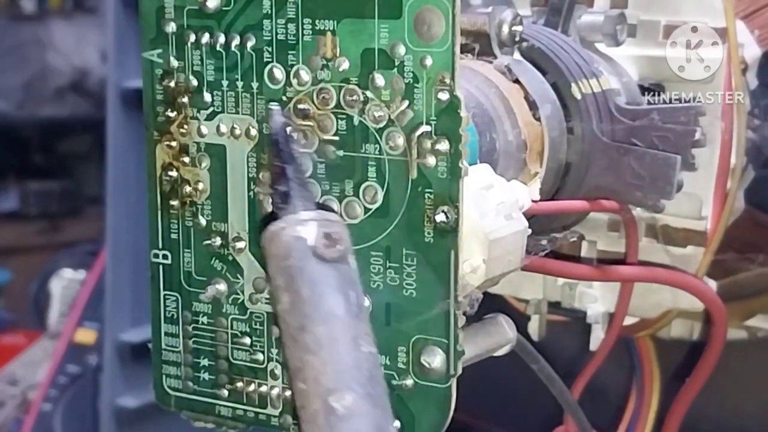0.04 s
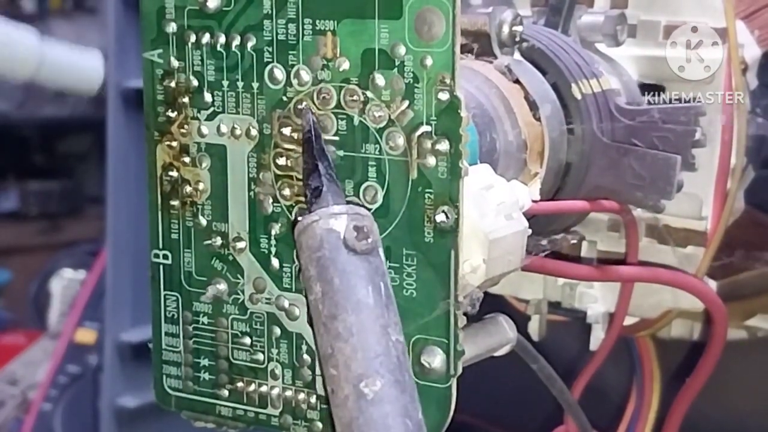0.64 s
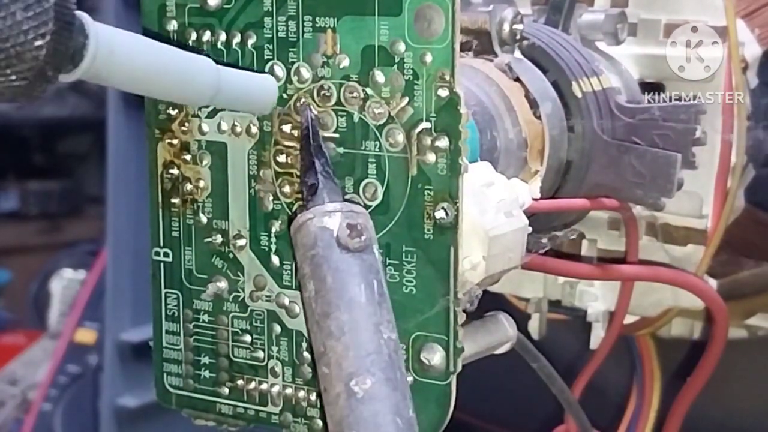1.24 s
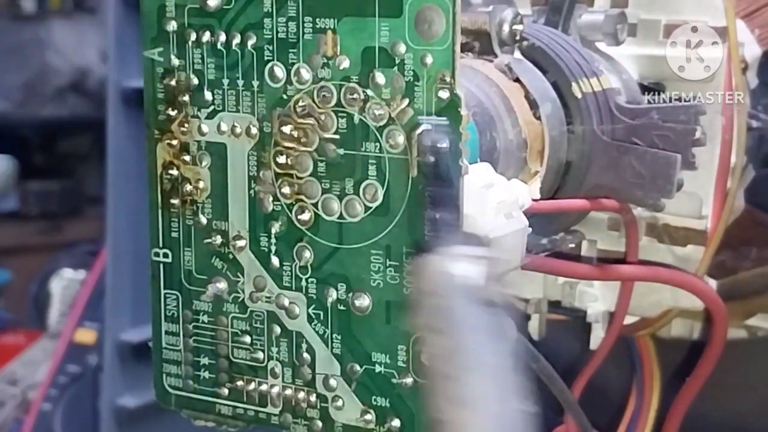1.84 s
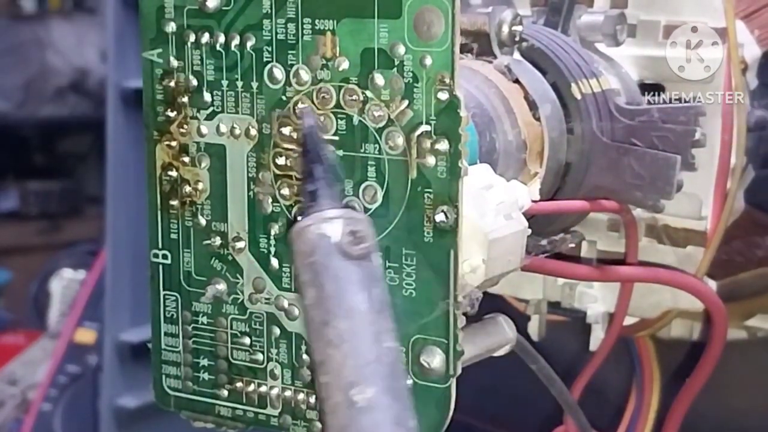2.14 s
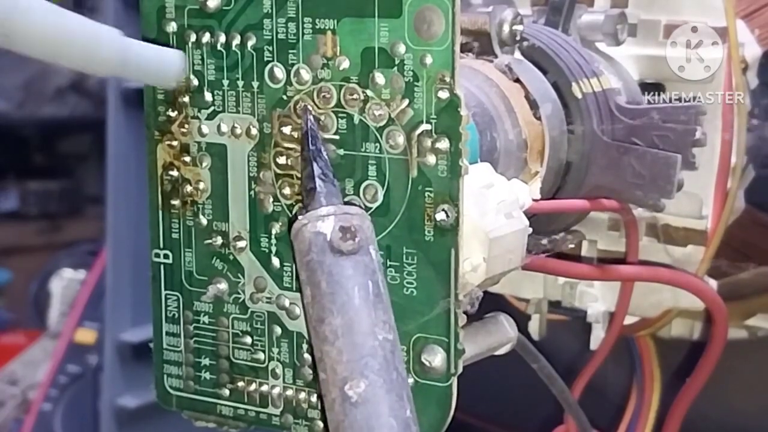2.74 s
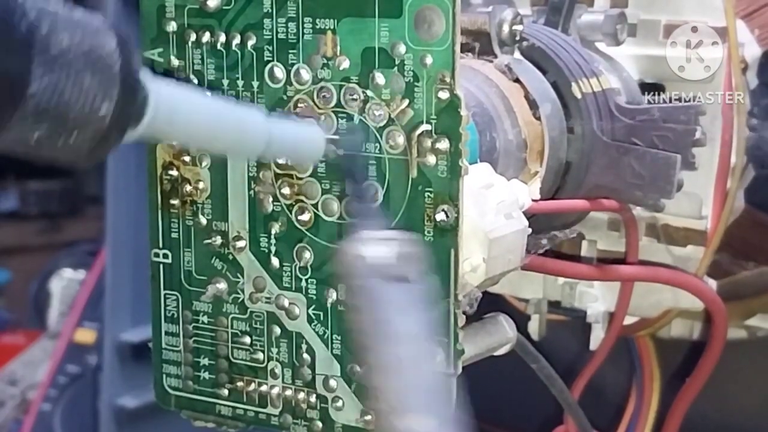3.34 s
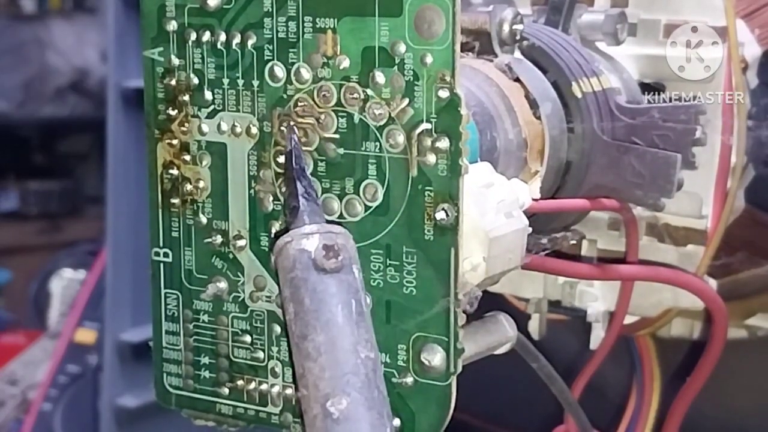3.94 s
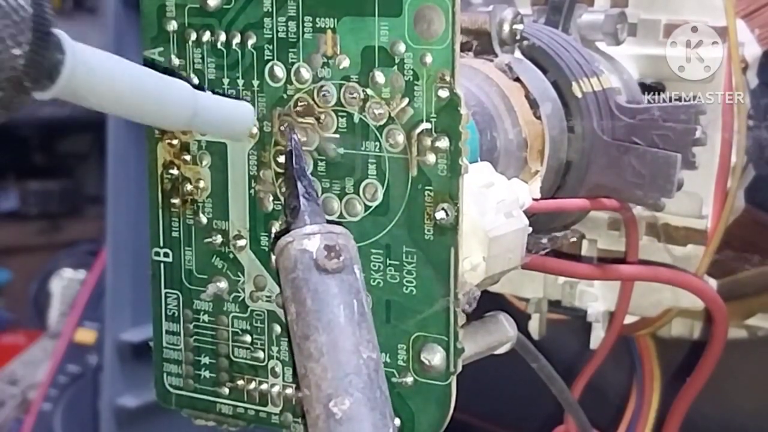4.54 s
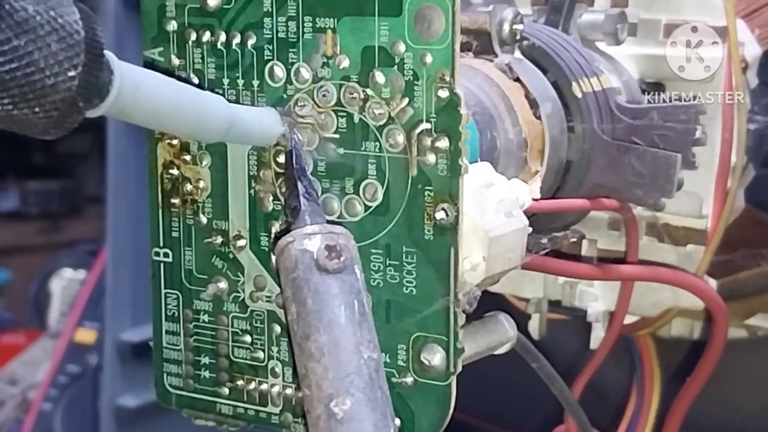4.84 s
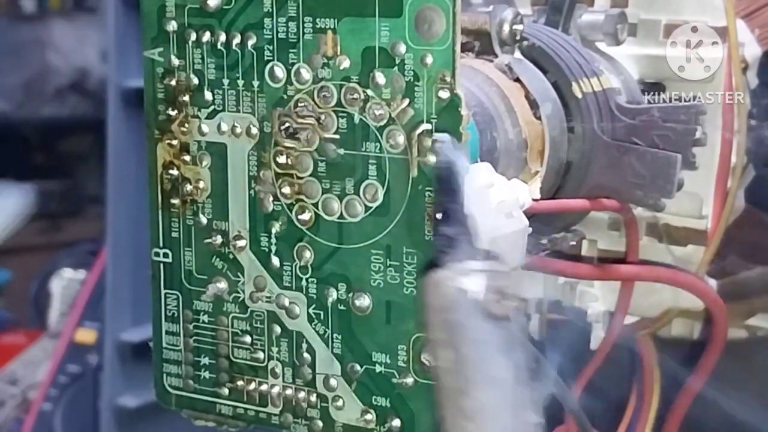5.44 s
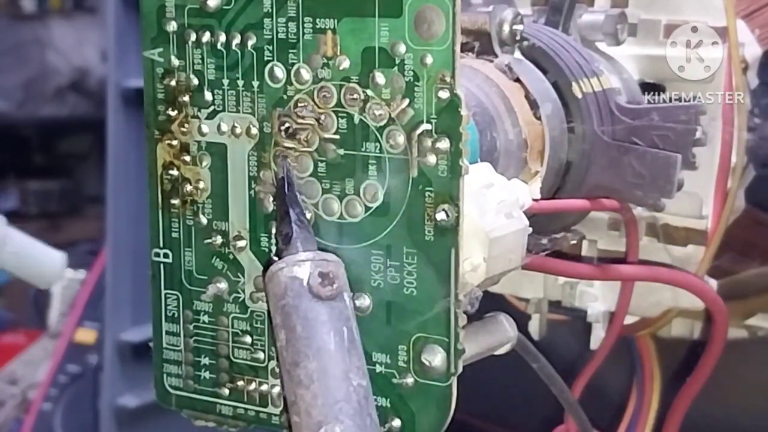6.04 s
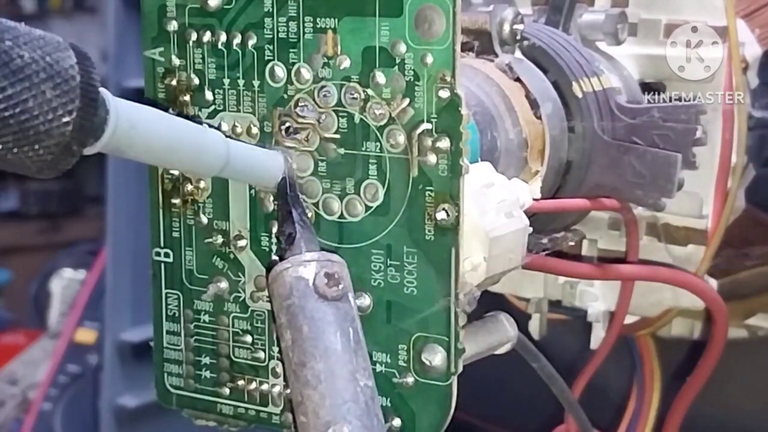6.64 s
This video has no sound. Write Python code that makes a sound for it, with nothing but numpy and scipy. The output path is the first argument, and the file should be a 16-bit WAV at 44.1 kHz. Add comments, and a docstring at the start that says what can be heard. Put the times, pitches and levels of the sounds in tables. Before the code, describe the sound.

A solder sucker is worked close to the microphone in a small workshop. Throughout, a draught buffets the left side with low, uneven rumbles over a quiet room hum. At about 0.2 seconds the plunger is pushed down and latches with a sharp click. Flux sizzles very faintly during the first two seconds. At 1.7 seconds the spring releases with a sharp, slightly ringing snap, and the tool is recocked with two clicks around 2.2 seconds. A bird chirps faintly outside from 2.5 to 3 seconds. A second snap comes at 3.4 seconds, followed by cocking clicks and a soft thud of air near 3.9. A vehicle passes quietly, closest at 4.5 seconds with a faint brake squeal. As it fades, the sucker fires again at 5.3 seconds and latches near 5.9. Light metal ticks are scattered around the snaps until about 6.2 seconds.

```python
"""Desoldering in a small workshop, close to a phone. From the start a draught buffets the left microphone
port over the room's hum, flux sizzles faintly, and a solder sucker is pushed down until it latches. Metal
parts tick; the released spring drives the piston into its stop, and the tool is cocked again. A bird calls
outside, then comes a second shot and a third cocking. A vehicle passes with a faint squeal of brakes,
and as it fades the sucker fires a third time and is latched once more."""
import sys
import numpy as np
from scipy import signal
from scipy.fft import rfft, irfft, next_fast_len
from scipy.io import wavfile
from scipy.ndimage import uniform_filter1d

SR = 44100
rng = np.random.default_rng(int(sys.argv[2]) if len(sys.argv) > 2 else 0)


def transcribe(signal):
    """Save signal, clipped to [-1, 1], as a 16-bit WAV file at the path in sys.argv[1]."""
    frames = np.atleast_2d(signal).T
    limited = np.clip(frames, -1, 1)
    pcm = np.round(limited * 32767).astype(np.int16)
    wavfile.write(sys.argv[1], SR, pcm)


N = 295029
T = np.arange(N) / SR

# Spectra of the steady noises. Each row: frequency in Hz, relative level in dB.
ROOM_SPECTRUM = [(25, -13), (50, 7), (100, 5.5), (180, -8), (290, -1.5), (450, -10), (1000, -20.5),
                 (1800, -25.5), (3800, -31.5), (5600, -23), (8000, -28.5), (10000, -25), (15000, -36)]
ROAD_SPECTRUM = [(60, 16.5), (110, 9.5), (280, 10), (470, 0), (610, 1.5), (740, 0), (1000, -1),
                 (1400, -6.5), (2000, -7), (2330, -12), (3000, -9.5), (6500, -18.5), (9800, -14.5),
                 (15000, -25)]
DRAUGHT_SPECTRUM = [(20, -32.5), (35, -14), (55, 2.5), (78, -2.5), (105, -1.5), (190, -12), (280, -17.5),
                    (420, -30), (800, -47.5), (2000, -63.5)]
# Tones of mains and fan, engine and gears, and brakes. Each row: frequency in Hz, relative level in dB.
HUM_TONES = [(100.5, -69), (269, -76), (301, -79)]
ENGINE_TONES = [(608, -17), (1000, -15), (2330, -19)]
BRAKE_TONES = [(3338, -66), (4700, -69), (4759, -66), (5814, -63.5), (9432, -75), (11370, -79)]
# Bird calls. Each row: start and length in seconds, first and last frequency in Hz, level in dB.
BIRD_CALLS = [(2.49, 0.094, 5870, 3850, -64.5), (2.556, 0.11, 4730, 3720, -63),
              (2.698, 0.12, 4560, 4430, -69.5), (2.972, 0.1, 5500, 3750, -59.5)]
# Gusts at the port. Each row: start in seconds, length in seconds, relative level in dB.
GUSTS = [(0, 0.067, -43.5), (0.068, 0.14, -41.5), (0.319, 0.13, -53), (0.629, 0.21, -42),
         (1.046, 0.39, -50.5), (1.296, 0.075, -37), (1.444, 0.14, -43), (1.607, 0.38, -45),
         (2.102, 0.39, -74), (2.269, 0.02, -47), (2.931, 0.12, -58.5), (2.999, .58, -41.5),
         (3.681, 0.056, -44), (3.936, 0.022, -31), (4.05, 0.049, -39), (4.32, 0.057, -42.5),
         (4.402, 1.72, -53), (4.548, 0.39, -44), (5.242, 0.18, -46), (5.41, 0.094, -37.5),
         (5.679, 0.28, -40), (6.215, 1.04, -50.5), (6.33, 0.079, -41)]
# The strongest eddies, and air from the nozzle hitting the port. Each row: time in seconds, level in dB.
STRONG_EDDIES = [(.656, -23.5), (0.687, -17.5), (1.344, -16), (1.479, -24), (1.631, -21.5), (1.861, -18),
                 (3.03, -16), (3.103, -19), (3.306, -16), (4.894, -18.5), (5.135, -20), (5.429, -19.5),
                 (5.741, -17), (5.959, -20.5)]
NOZZLE_PUFF = [(3.9402, -17)]
# Flux boiling at the tip. Each row: start and length in seconds, relative level in dB, band frequency in Hz.
SIZZLES = [(0.034, 0.098, -42, 12030), (0.637, 0.055, -51, 3180), (0.872, 0.11, -57.5, 9250),
           (1.27, 0.13, -47, 2980), (1.29, .1, -72, 10900), (1.656, 0.052, -53.5, 3280)]
# Light contacts of trigger, thumb, nozzle and iron, and hollow knocks of the plastic grip.
# Each row: time in seconds, relative level in dB.
TICKS = [(0.3574, -31), (0.4468, -30), (0.4624, -29), (1.723, -32), (1.7348, -26.5), (1.9201, -27),
         (2.3962, -26), (2.708, -49.5), (3.3708, -25.5), (3.5906, -21.5), (3.608, -29), (4.057, -28),
         (4.0978, -43), (5.3135, -32), (5.527, -25), (5.8689, -22), (5.972, -38), (6.1932, -43),
         (6.199, -40)]
GRIP_KNOCKS = [(.3365, -36.5), (1.7245, -45.5)]
# Blows on the sucker: the thumb starts the plunger, the catch takes it, the piston hits its stop.
# Each row: time in seconds, relative level in dB, offsets in dB for the spring and for the barrel.
PUSHES = [(.194, -20, -9.5, -14), (2.1218, -21, -6, 4), (3.808, -20, 2.5, -1), (5.7402, -19, -3, -0.5)]
LATCHES = [(0.36, -16, -16, 7.5), (2.278, -14.5, -2, -8), (3.941, -12.5, -8, -4), (5.8725, -15, 3, 3.5)]
SHOTS = [(1.7424, -17.5, 0.5, -2), (3.3967, -19, -2.5, -6), (5.3418, -17.5, -3.5, -3.5)]
# Spectra of the contacts. Each row: frequency in Hz, relative level in dB.
TICK_SPECTRUM = [(200, -12.5), (1000, -14), (2700, -17), (3600, -6), (4800, -2.5), (7000, -8.5),
                 (11000, -11.5), (15000, -14.5)]
GRIP_SPECTRUM = [(300, -20), (750, -10), (1050, 5.5), (1400, -7.5), (1850, -4.5), (2500, -10),
                 (4000, -10.5), (12000, -10)]
PUSH_SPECTRUM = [(200, 9), (600, -8.5), (1800, -14), (3000, -6.5), (4900, 5), (6300, -1.5), (8500, 3.5),
                 (10300, -1), (11800, 0.5), (15000, -1)]
LATCH_SPECTRUM = [(200, -0.5), (700, -13), (1600, -30.5), (2450, -8.5), (3200, 1.5), (3500, -7.5),
                  (4200, 0.5), (5200, -4.5), (8200, -2), (10500, -6.5), (12700, -8.5), (15000, -4.5)]
SHOT_SPECTRUM = [(200, 0), (700, -9), (1800, -15.5), (2400, -6.5), (2870, -7), (3200, 0.5), (3900, -8),
                 (5200, 1.5), (6800, -4), (8200, -1.5), (10000, -3.5), (11800, -1), (15000, -8)]
# Modes of the puff's thud, the barrel, the spring and the body that the recoil shakes.
# Each row: frequency in Hz, relative level in dB, time to decay by 60 dB in seconds.
THUD_MODES = [(161, 13, 0.015), (66, -4.5, 0.064)]
BARREL_MODES = [(3930, -35, .06), (4365, -20.5, .018), (4450, -23, .014), (4900, -33, .02),
                (8200, -36.5, 0.068)]
SPRING_MODES = [(2870, -33, .07), (3070, -32, .045)]
BODY_MODES = [(150, -27, 0.037), (216, -20.5, 0.12), (468.6, -33.5, 0.13)]


def undb(db):
    """Amplitude ratio of a level in decibels."""
    return 10 ** (np.asarray(db) / 20)


def unit(x):
    """Normalisation to an rms of 1."""
    return x / np.sqrt(np.mean(x ** 2))


def add(out, s, sound):
    """Superposition: a sound joins the mix at s seconds."""
    i = max(int(s * SR), 0)
    out[i:i + len(sound)] += sound[:N - i]


def impulses(rows):
    """Ideal impacts: one impulse for each row of time and level."""
    out = np.zeros(N)
    for s, db, *_ in rows:
        add(out, s, undb([db]))
    return out


def ring(x, response):
    """Convolution: a linear system answers x through its impulse response."""
    return signal.fftconvolve(x, response)[:N]


def cut(x, hz, kind, order=2):
    """Butterworth filtering, maximally flat in the passband."""
    sections = signal.butter(order, np.minimum(hz, SR / 2 - 1), kind, fs=SR, output="sos")
    return signal.sosfilt(sections, x)


def gains(spectrum, size):
    """Gains on the bins of a transform, by interpolation of level over log frequency."""
    hz, db = np.transpose(spectrum)
    return undb(np.interp(np.log(np.fft.rfftfreq(size, 1 / SR) + 1), np.log(hz), db))


def noise(spectrum):
    """Spectral shaping of white noise, at an rms of 1."""
    size = next_fast_len(N, True)
    return unit(irfft(rfft(rng.standard_normal(size)) * gains(spectrum, size))[:N])


def colour(spectrum, size=1024):
    """Minimum-phase response of unit energy, by folding the cepstrum onto positive time."""
    cepstrum = irfft(np.log(gains(spectrum, size)))
    cepstrum[1:size // 2] *= 2
    cepstrum[size // 2 + 1:] = 0
    response = irfft(np.exp(rfft(cepstrum)))
    return response / np.linalg.norm(response)


def drift(per_s):
    """Random modulation of rms 1: straight ramps join per_s values a second."""
    step = int(SR / per_s)
    held = np.repeat(rng.standard_normal(N // step + 1), step)
    return unit(uniform_filter1d(held, step)[:N])


def tones(rows, waver):
    """Frequency modulation: each sinusoid wanders by the rms fraction waver."""
    return sum(undb(db) * np.sin(2 * np.pi * np.cumsum(hz * (1 + waver * drift(150))) / SR)
               for hz, db in rows)


def modes(rows):
    """Free vibration as a sum of exponentially damped sinusoids."""
    t = T[:SR // 2]
    return sum(undb(db - 60 * t / t60) * np.sin(2 * np.pi * hz * t) for hz, db, t60 in rows)


def contacts(rows, chatter_s, swell_s, swell_db):
    """Exponential envelopes: a brief noise swells into each click, and chatter decays after it."""
    out, t = np.zeros(N), T[:SR // 20]
    for s, db, *_ in rows:
        chatter, swell = rng.choice([-1., 1.], (2, len(t))) * np.exp(-t / np.array([[chatter_s], [swell_s]]))
        add(out, s, undb(db) * chatter / np.linalg.norm(chatter))
        add(out, s - len(t) / SR, undb(db + swell_db) * swell[::-1] / np.linalg.norm(swell))
    return out


def reverberation(x, t60, treble_t60, crossover_hz=2500):
    """Diffuse field: each port receives different reflections, and the treble decays sooner."""
    t, out = T[:SR], []
    for hiss in rng.standard_normal((2, SR)):
        bass = cut(hiss, crossover_hz, "low") * undb(-60 * t / t60)
        treble = cut(hiss, crossover_hz, "high") * undb(-60 * t / treble_t60)
        tail = (bass - treble) * (1 - np.exp(-t / .0008))
        tail *= 1 + 3.1 * np.exp(-t / 0.0035)  # strong early reflections
        out.append(ring(x, tail / np.linalg.norm(tail)))
    return np.array(out)


def near(x, db, right_db, room_db, radiated=None, lag_samples=19):
    """Direct sound reaches the left port first and louder; what radiates all round excites the room."""
    direct = np.array([x, undb(right_db) * np.roll(x, lag_samples)])
    room = reverberation(x if radiated is None else radiated, t60=0.32, treble_t60=0.24)
    return undb(db) * (direct + undb(room_db) * room * undb([[-.8], [.8]]))


def room_tone():
    """Noise floor: broadband hiss and the building's murmur, with tones of mains and fan."""
    murmur = undb(-65) * cut(noise(ROOM_SPECTRUM), 700, "low")
    hum = tones(HUM_TONES, waver=0.01) * undb(2.8 * drift(8))
    hiss = undb(-62.5) * np.array([noise(ROOM_SPECTRUM) for _ in range(2)])
    return (hiss + murmur) * undb(0.78 * drift(14)) + hum


def vehicle(closest_s=4.476, approach_s=1.0, leave_s=1.48):
    """A passing source: tyres and engine are louder and brighter when close; the brakes squeal faintly."""
    away = (T - closest_s) / np.where(T < closest_s, approach_s, leave_s)
    passing, far_traffic = undb(-48.5) * np.exp(-away ** 2), undb(-77)
    db = 20 * np.log10(np.hypot(passing, far_traffic))
    tyres = np.array([noise(ROAD_SPECTRUM) * undb(1.3 * drift(14)) for _ in range(2)])
    engine = tones(ENGINE_TONES, waver=0.053) * undb(1.8 * drift(3.2))
    rolling = tyres + reverberation(engine, t60=0.24, treble_t60=0.16)
    bass = cut(rolling, 2200, "low", order=1)
    treble = (rolling - bass) * undb(0.2 * (db - db.max()))
    road = (bass + treble) * undb(db + np.array([[-.7], [.7]]))
    squeal = tones(BRAKE_TONES, waver=0.013) * np.exp(-((T - 4.48) / 0.21) ** 2)
    return road + reverberation(squeal, t60=0.28, treble_t60=0.17)


def bird():
    """Falling frequency sweeps, rougher when wider, smeared by reflection from the house fronts."""
    out = np.zeros(N)
    for s, length, start_hz, end_hz, db in BIRD_CALLS:
        size = int(length * SR)
        roughness_hz = .17 * (start_hz - end_hz) * drift(1500)[:size]
        hz = np.geomspace(start_hz, end_hz, size) + roughness_hz
        add(out, s, undb(db) * np.sqrt(np.hanning(size)) * np.sin(2 * np.pi * np.cumsum(hz) / SR))
    return reverberation(out, t60=1.0, treble_t60=0.81)


def gusts(attack_s=0.0086, release_s=0.017, sag_db=3, flutter_db=3):
    """Envelope of an unsteady flow: gusts rise, sag and die away, adding in power."""
    power = np.zeros(N)
    for s, length, db in GUSTS:
        rise = np.clip((T - s) / attack_s, 0, 1)
        sag = undb(-sag_db * np.clip((T - s) / length, 0, 1))
        release = np.exp(-np.clip((T - s - length) / release_s, 0, 20))
        power += (undb(db) * rise * sag * release) ** 2
    return np.sqrt(power) * undb(flutter_db * drift(35))


def draught(eddies_per_s=28, eddy_width_s=0.00169):
    """Turbulent pressure and a puff from the nozzle strike the left port; the right is sheltered."""
    strength = gusts()
    radius_squared = ((T[:SR // 25] - 1 / 50) / eddy_width_s) ** 2
    eddy_pulse = (radius_squared - 1) * np.exp(-radius_squared / 2)  # suction between two pushes
    small_eddies = (rng.random(N) < eddies_per_s / SR) * strength * undb(14.5)
    eddies = signal.fftconvolve(impulses(STRONG_EDDIES) + small_eddies, eddy_pulse, "same")
    drone = unit(tones(HUM_TONES[:1], waver=0.021))  # the low hum swells with the gusts
    thud = ring(impulses(NOZZLE_PUFF), modes(THUD_MODES))
    left = strength * (undb(5.5) * noise(DRAUGHT_SPECTRUM) + drone) + eddies - thud
    right = undb(-10) * strength * noise(DRAUGHT_SPECTRUM)
    return np.array([left, right])


def flux():
    """Boiling: dense tiny bursts merge into band-limited noise that swells and fades."""
    out = np.zeros(N)
    for s, length, db, hz in SIZZLES:
        size = int(length * SR)
        bursts = rng.standard_normal(N) * undb(3.1 * rng.exponential(size=N))
        sizzle = unit(cut(bursts, [hz * 0.5, hz * 1.2], "band", order=1))
        add(out, s, undb(db) * np.hanning(size) * sizzle[:size])
    return near(out, db=-22, right_db=-38, room_db=8)


def ticks(mean_bounce_s=.01, bounce_loss_db=8):
    """Inelastic impact: small metal parts touch and rebound once, more weakly, after an uneven delay."""
    delays = mean_bounce_s * (.5 + rng.random(len(TICKS)))
    touches = TICKS + [(s + delay, db - bounce_loss_db) for (s, db), delay in zip(TICKS, delays)]
    crack = contacts(touches, chatter_s=0.00014, swell_s=0.0011, swell_db=-16)
    response = colour(TICK_SPECTRUM)
    radiated = ring(impulses(touches), response)
    return near(ring(crack, response), db=16, right_db=-8.5, room_db=-11.5, radiated=radiated)


def plunger():
    """Stick-slip friction: the seal rubs down the barrel from push to catch; the grip knocks in the hand."""
    moving = sum((T > push[0]) & (T < latch[0]) for push, latch in zip(PUSHES, LATCHES))
    slips = rng.standard_normal(N) * undb(1.4 * rng.exponential(size=N))
    rub = unit(cut(slips, [1100, 4500], "band", order=1))
    grip_clicks = contacts(GRIP_KNOCKS, chatter_s=.002, swell_s=0.0013, swell_db=-18.5)
    knock = ring(grip_clicks, colour(GRIP_SPECTRUM))
    return (near(rub * moving, db=-62, right_db=-15.5, room_db=-4.5)
            + near(knock, db=23.5, right_db=-9, room_db=-1.5))


def struck_sucker(blows, crack, spectrum, db, ring_db, right_db, room_db):
    """Impact excitation: each blow gives a short crack and sets the modes of barrel and spring ringing."""
    response = colour(spectrum)
    spring_jolts = impulses([(s, blow_db + spring_db) for s, blow_db, spring_db, _ in blows])
    barrel_jolts = impulses([(s, blow_db + barrel_db) for s, blow_db, _, barrel_db in blows])
    spring = ring(spring_jolts, modes(SPRING_MODES))
    barrel = undb(ring_db) * ring(barrel_jolts, modes(BARREL_MODES))
    direct = ring(crack, response) + barrel + spring
    radiated = ring(impulses(blows), response) + barrel + spring / 2
    return near(direct, db, right_db, room_db, radiated)


def cocking():
    """Two impacts: the plunger is knocked into motion, then snaps into its catch with a dry knock."""
    push = contacts(PUSHES, chatter_s=0.0023, swell_s=0.001, swell_db=10)
    latch = contacts(LATCHES, chatter_s=0.0004, swell_s=0.00073, swell_db=-12.5)
    knock = cut(impulses(LATCHES), [300, 2000], "band", order=1)
    return (struck_sucker(PUSHES, push, PUSH_SPECTRUM, db=9.5, ring_db=-9, right_db=-24, room_db=3.5)
            + struck_sucker(LATCHES, latch, LATCH_SPECTRUM, db=22, ring_db=-11.5, right_db=-12.5, room_db=-5.5)
            + near(knock, db=9, right_db=-18, room_db=-24.5))


def firing(slam_delay_s=.007, slam_db=3.5, slam_spring_db=3.5):
    """Stored elastic energy drives the piston into its stop; air rushes in and the recoil thumps."""
    # The piston strikes twice, harder the second time.
    blows = SHOTS + [(s + slam_delay_s, db + slam_db, spring_db + slam_spring_db, barrel_db)
                     for s, db, spring_db, barrel_db in SHOTS]
    crack = contacts(blows, chatter_s=0.0013, swell_s=0.0045, swell_db=-2.5)
    inrush = contacts(blows, chatter_s=0.0015, swell_s=0.00057, swell_db=-5.5)
    suction = cut(inrush, [520, 1400], "band", order=1)
    thump = ring(impulses(blows), modes(BODY_MODES))
    return (struck_sucker(blows, crack, SHOT_SPECTRUM, db=18.5, ring_db=-13, right_db=-24.5, room_db=-2.5)
            + near(suction, db=24, right_db=-8.5, room_db=-16)
            + near(thump, db=9.5, right_db=0.5, room_db=-5.5))


def scene():
    """Superposition of all sources at the two ports."""
    sucker = cocking() + plunger() + firing()
    return sucker + ticks() + flux() + draught() + bird() + vehicle() + room_tone()


def record(dry, bottom_hz=28, top_hz=15600, ceiling=.9):
    """Band limiting and soft saturation: the phone drops deep bass, rounds the peaks and cuts the top."""
    rounded = ceiling * np.tanh(cut(dry, bottom_hz, "high") / ceiling)
    return signal.sosfilt(signal.ellip(10, .2, 80, top_hz, fs=SR, output="sos"), rounded)


dry = scene()
out = record(dry)
transcribe(out)
```